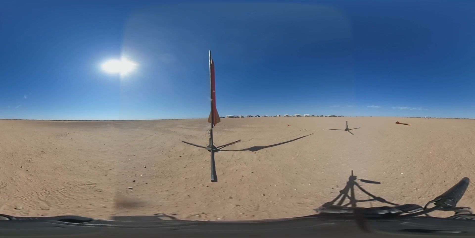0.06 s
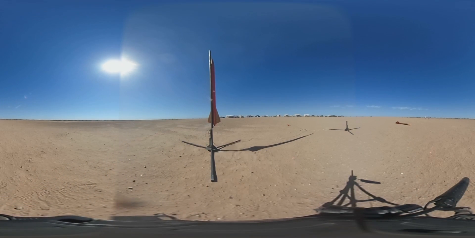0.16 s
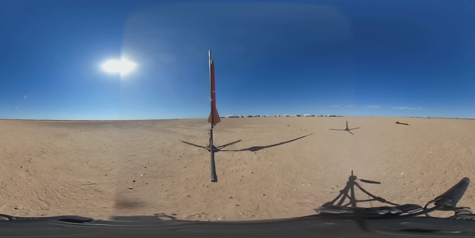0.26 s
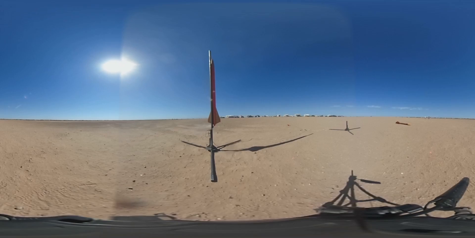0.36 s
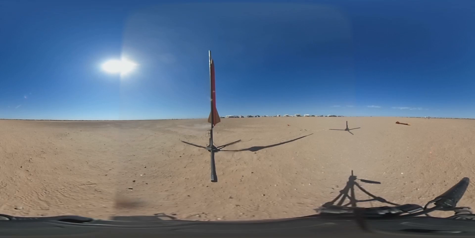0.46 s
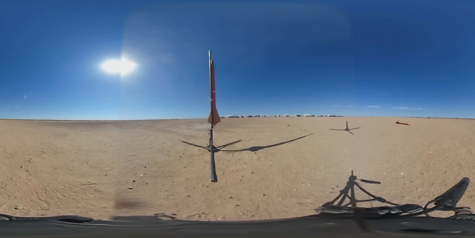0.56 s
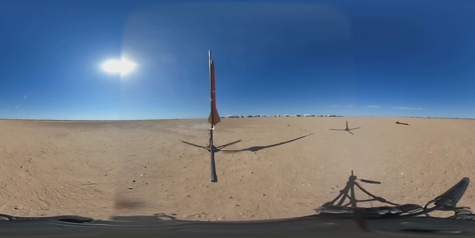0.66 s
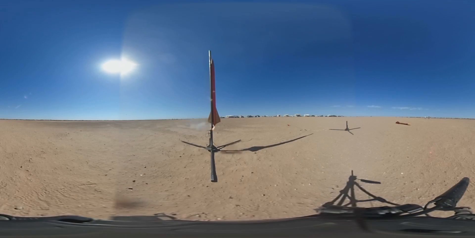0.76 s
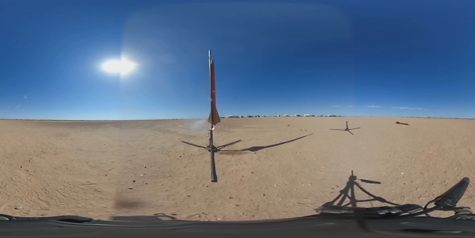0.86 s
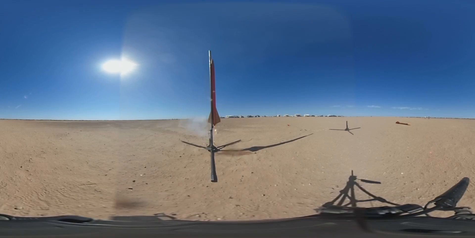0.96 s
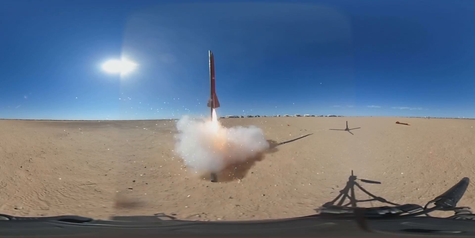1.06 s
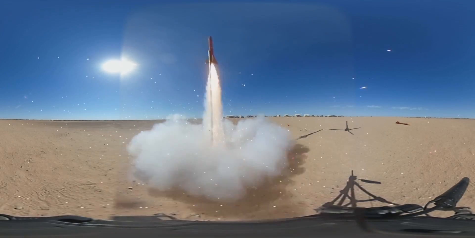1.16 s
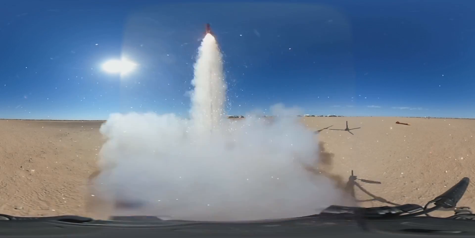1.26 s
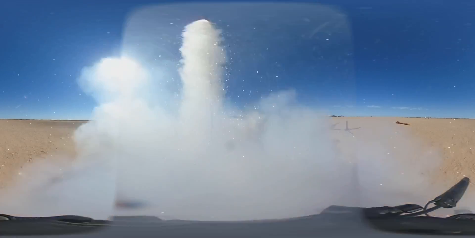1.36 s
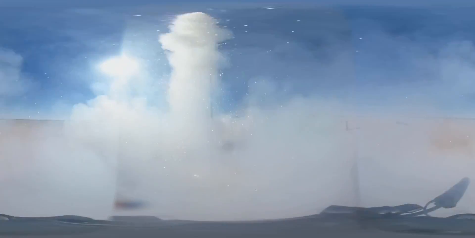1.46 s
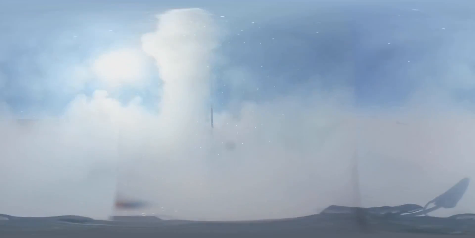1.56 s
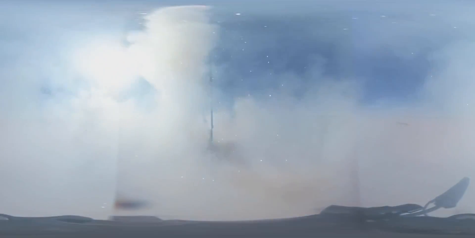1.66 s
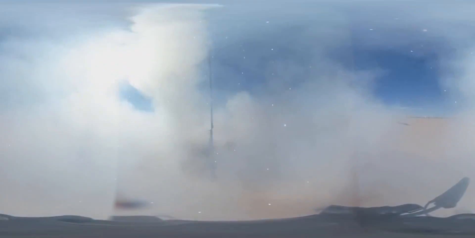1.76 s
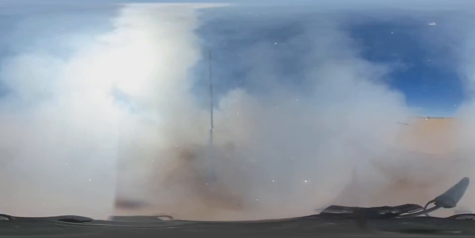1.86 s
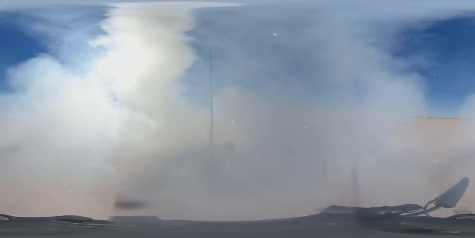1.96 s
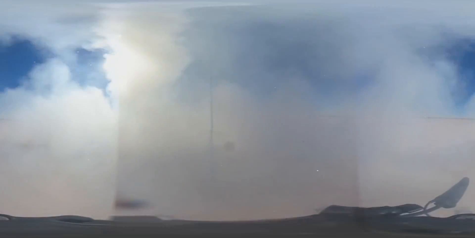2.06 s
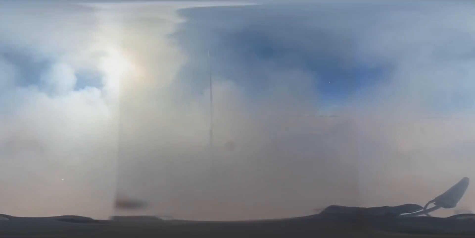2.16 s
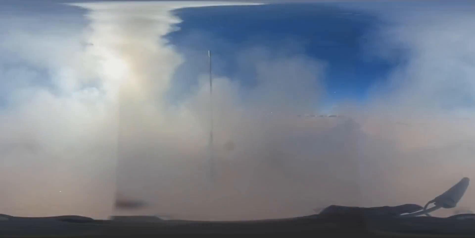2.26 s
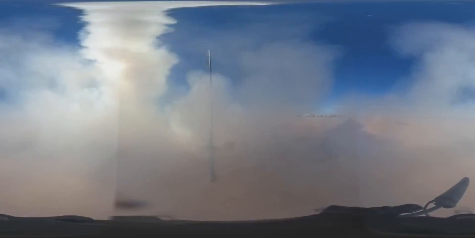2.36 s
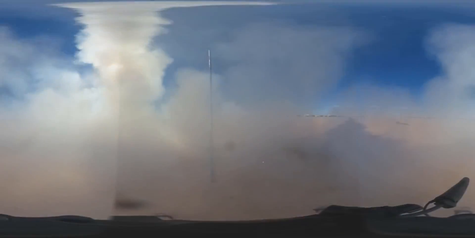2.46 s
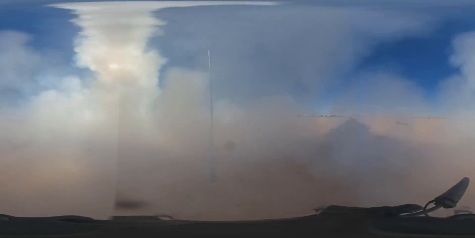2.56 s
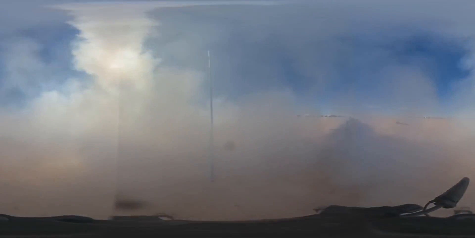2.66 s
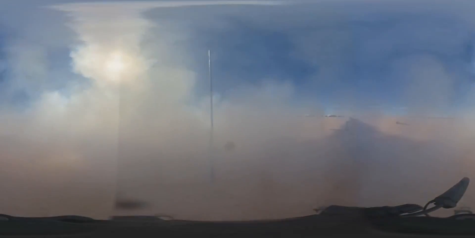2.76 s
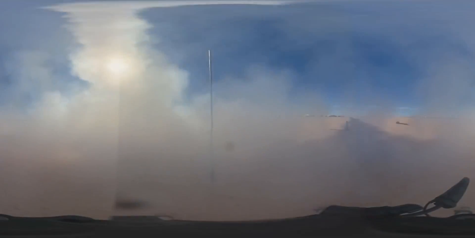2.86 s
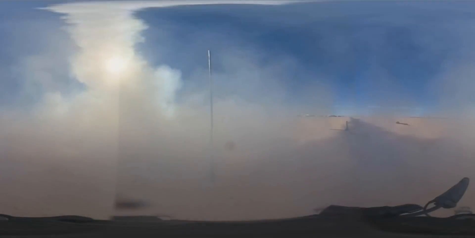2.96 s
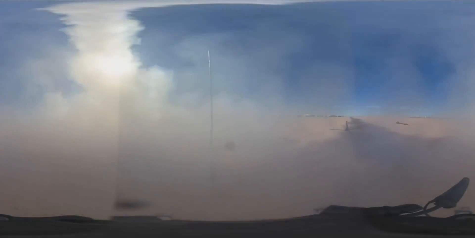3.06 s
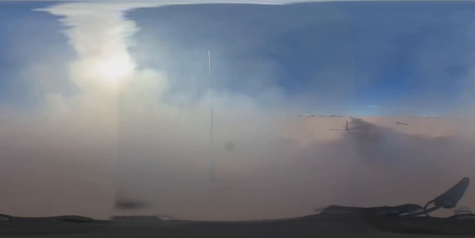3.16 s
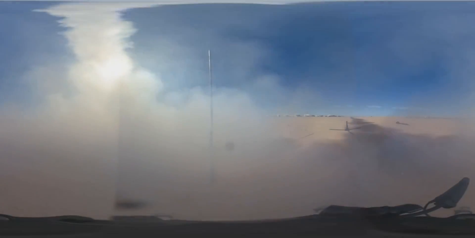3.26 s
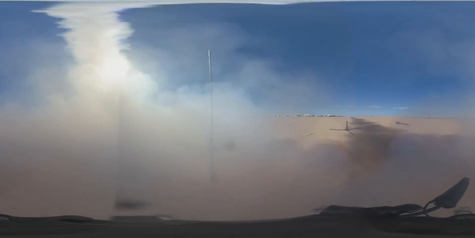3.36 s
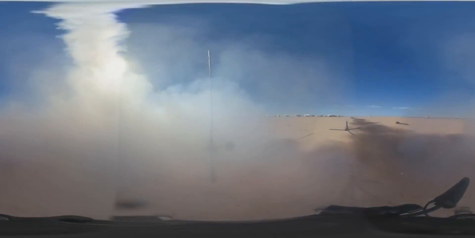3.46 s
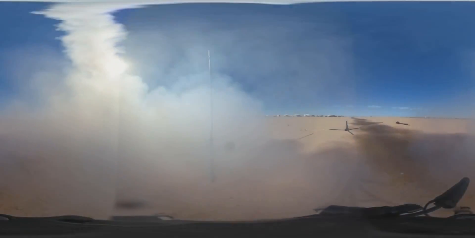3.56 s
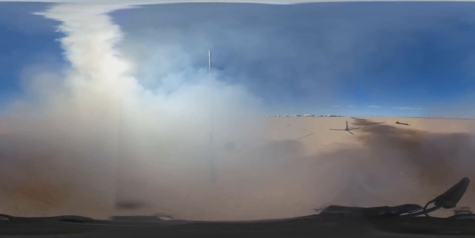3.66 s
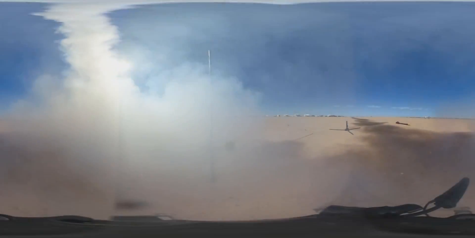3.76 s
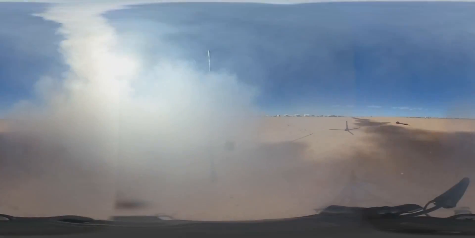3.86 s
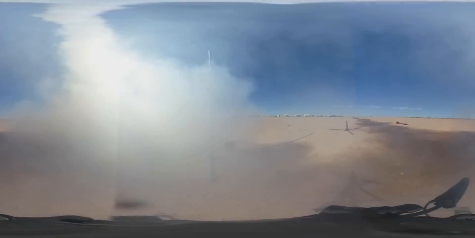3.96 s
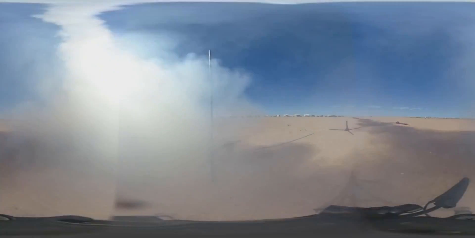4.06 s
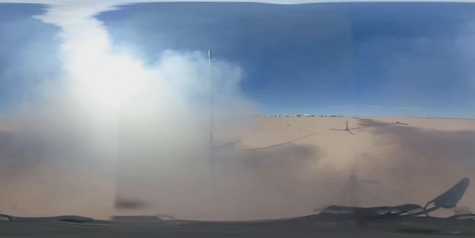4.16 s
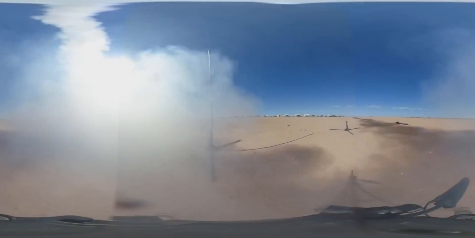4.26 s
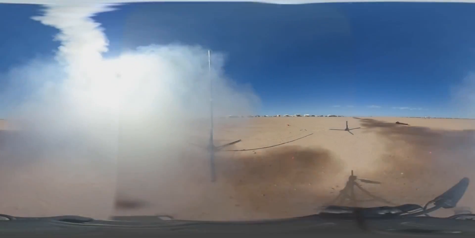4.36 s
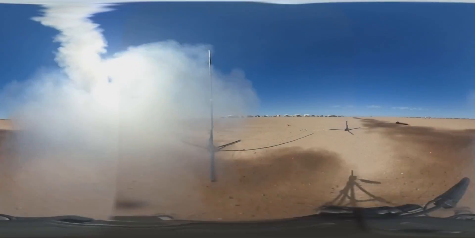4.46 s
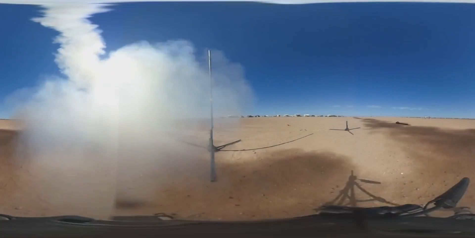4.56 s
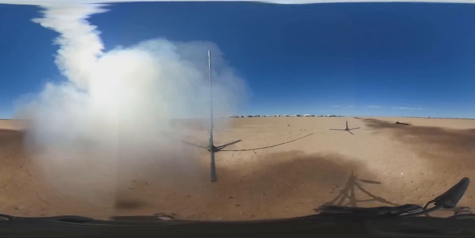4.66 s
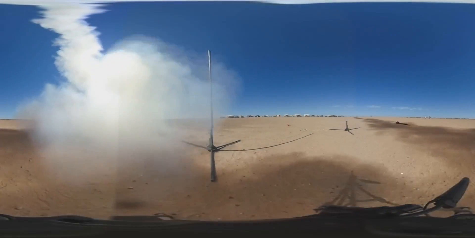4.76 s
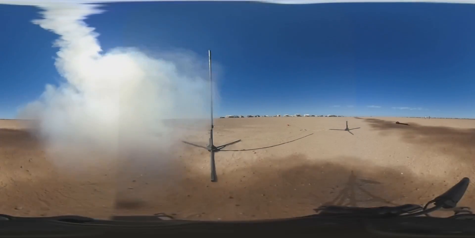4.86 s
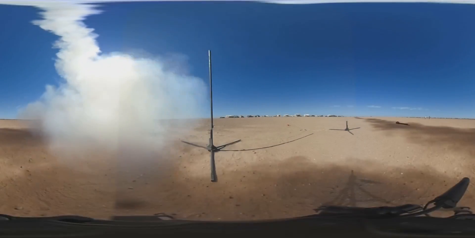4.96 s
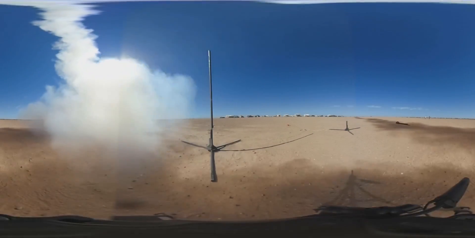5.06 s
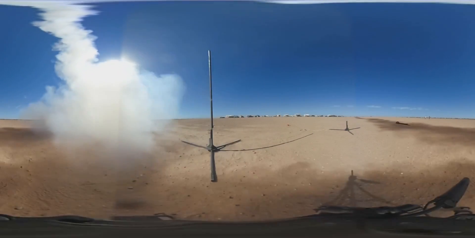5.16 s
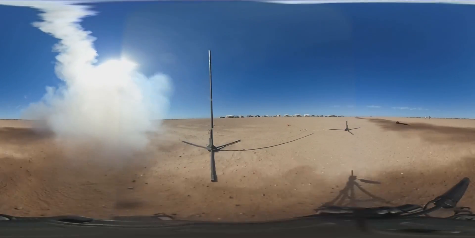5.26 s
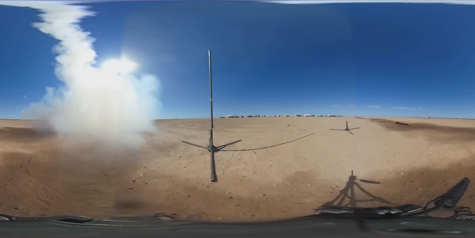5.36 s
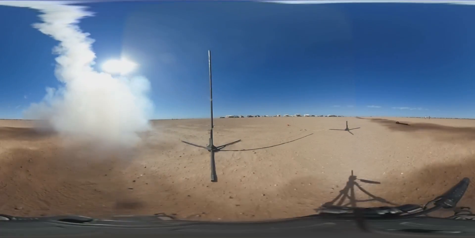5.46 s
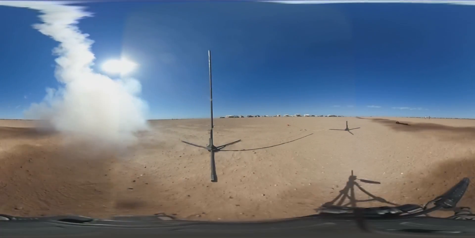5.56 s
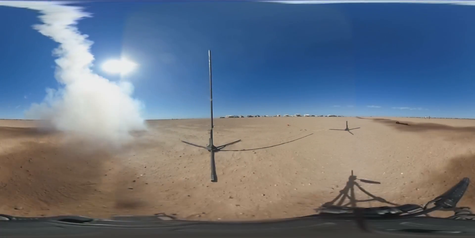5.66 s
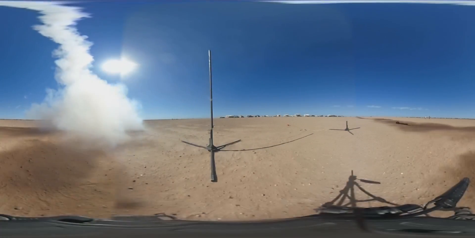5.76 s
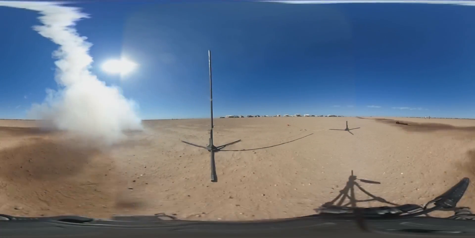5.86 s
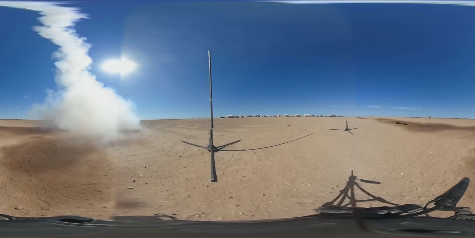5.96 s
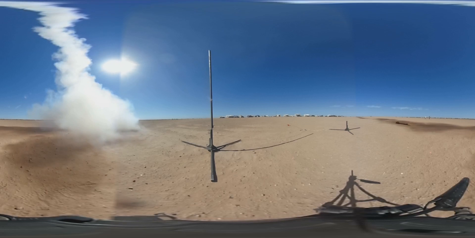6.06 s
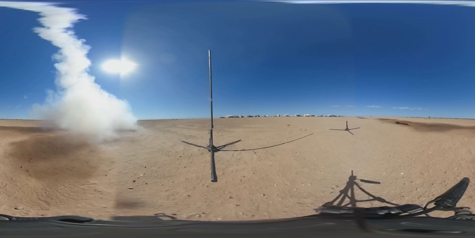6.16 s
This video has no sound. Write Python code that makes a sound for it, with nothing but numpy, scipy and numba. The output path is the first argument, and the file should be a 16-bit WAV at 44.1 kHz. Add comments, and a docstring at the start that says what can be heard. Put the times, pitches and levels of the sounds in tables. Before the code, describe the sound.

For the first 0.7 seconds there is only faint air hiss and a thin, high electrical whine, with a slight fizz growing. At 0.7 a soft pop lights the igniter; a flame swells, spitting sharper pops and a whistling hiss up to 1.03. Then the motor catches abruptly: a very loud, tearing blast a few metres away, overloading the small microphone into flat distortion, with heavy low gusts. From about 1.3 to 1.7 the sound deepens into a rumbling roar, its ground echo sweeping the tone. Between 1.8 and 2.3 it recedes with hard, irregular chuffs and crackle, while sand begins ticking on the housing. The weakening roar surges near 2.55 and stops around 3.1. A thin far echo rolls away, sparse grains tick, and low buffets thump until about 4.4. Quiet air, whine and a light breeze around 5 remain; the whine flicks upward and switches off just before 6.

```python
"""Open desert ground, where a hobby rocket lifts off a few metres from a small microphone in a housing.
The igniter pops and spits as coloured noise and pulses; the motor catches and overloads the microphone.
Its roar, hiss and chuffs climb away; each reaches the microphone directly and as a delayed ground echo.
Blown sand (noise and clicks) ticks on the housing, the exhaust cloud gusts past as low noise, and the
roar returns from afar; faint air, a thin whine and a late breeze lie beneath."""
import sys
import numpy as np
from scipy import signal
from scipy.fft import rfft, irfft
from scipy.io import wavfile
from scipy.ndimage import uniform_filter1d
from numba import njit

SR = 44100
rng = np.random.default_rng(int(sys.argv[2]) if len(sys.argv) > 2 else 0)


def generate_wav(sig):
    """Save sig (samples, or channels by samples) to the path in sys.argv[1] as 16-bit PCM at SR."""
    pcm = np.round(np.clip(np.atleast_2d(sig).T, -1, 1) * 32767).astype(np.int16)
    wavfile.write(sys.argv[1], SR, pcm)


N = 274478
TIME = np.arange(N) / SR
# the burn as heard: igniter fires, propellant catches, thrust ends
IGNITE_S, CATCH_S, BURNOUT_S = .697, 1.033, 3.073
CATCH_ATTACK_S, BURNOUT_FALL_DB_PER_S = .016, 67.5
FLAME_FALL_DB_PER_S = 500  # flame, whistle and leak are cut off at the catch


def undb(db):
    """Decibels to gain."""
    return 10 ** (np.asarray(db) / 20)


def unit(x):
    """Scale to rms 1."""
    return x / np.sqrt(np.mean(x ** 2))


def noise():
    """White noise over the whole scene."""
    return rng.standard_normal(N)


def curves(table):
    """One control per column, its points joined by straight lines."""
    seconds, *columns = np.transpose(table)
    return [np.interp(TIME, seconds, column) for column in columns]


def colour(x, points):
    """Causal minimum-phase filter whose spectrum runs through (frequency [Hz], level [dB]) points."""
    hz, db = np.transpose(points)
    grid_hz = np.fft.rfftfreq(2048, 1 / SR)
    level_db = np.interp(np.log(grid_hz + 1), np.log(hz), db)
    cepstrum = irfft(np.log(undb(level_db)))
    # folding the cepstrum forward in time makes the filter causal
    cepstrum[1:1024] *= 2
    cepstrum[1025:] = 0
    impulse = irfft(np.exp(rfft(cepstrum)))
    return signal.oaconvolve(x, impulse)[:N]


def ring(x, hz, width_hz):
    """One resonance, gain 1 at its centre."""
    return signal.lfilter(*signal.iirpeak(hz, hz / width_hz, fs=SR), x)


def walk(rate):
    """Smooth random wander of rms 1, with a new target level rate times a second."""
    hold = int(SR / rate)
    steps = np.repeat(rng.standard_normal(N // hold + 1), hold)
    return unit(uniform_filter1d(uniform_filter1d(steps, hold), hold)[:N])


def clicks(rate, spread_db):
    """Random impulses, rate a second on average, mostly small and a few large; rms 1."""
    size = undb(spread_db * np.minimum(rng.exponential(size=N), 4))
    struck = rng.random(N) < rate / SR
    return unit(struck * size * rng.choice([-1, 1], N))


def puffs(table):
    """Each sudden puff of gas sends out a push followed by a suction."""
    out = np.zeros(N)
    for s, db, ms in table:
        near = slice(int((s - .02) * SR), int((s + .02) * SR))
        u = (TIME[near] - s) * 1000 / ms  # time in half lengths: the extremes lie at -1 and 1
        out[near] -= undb(db) * u * np.exp((1 - u ** 2) / 2)
    return out


def envelope(s, db, attack_s, hold_s, fall_db_per_s):
    """Gain that is fully up at s, holds, then dies away."""
    attack = np.clip(1 + (TIME - s) / attack_s, 0, 1) ** 2
    return attack * undb(db - fall_db_per_s * np.maximum(TIME - s - hold_s, 0))


def swell(s, db, growth_db_per_s, fall_db_per_s):
    """Gain that grows exponentially to its peak at s, then dies away."""
    growth_db = growth_db_per_s * np.maximum(s - TIME, 0)
    fall_db = fall_db_per_s * np.maximum(TIME - s, 0)
    return undb(db - growth_db - fall_db)


# still desert air and microphone hiss: (frequency [Hz], relative level [dB])
AIR_COLOUR = [(20, 1), (45, 3.5), (80, 1.5), (140, -2), (260, -3), (380, -8.5), (600, -8), (900, -15),
              (1500, -21.5), (3000, -24.3), (12000, -26.8)]
# thin electrical whine: (frequency before its final flick [Hz], mean rms level [dB])
WHINE = [(1394, -83.5), (1857, -90)]
# light breeze after the launch: (frequency [Hz], relative level [dB])
BREEZE_COLOUR = [(20, -1), (42, 1.5), (90, -1), (140, -18), (400, -47)]
AIR_DB, WHINE_END_S = -72.6, 5.99
WHINE_RISE, WHINE_GLIDE_S, WHINE_STOP_S = .1, .018, .006  # rise as a share of pitch
BREEZE_S, BREEZE_DB, BREEZE_ATTACK_S, BREEZE_FALL_DB_PER_S = 5.0, -68, 1.8, 5


def background():
    """Faint noise of air, a late breeze, and sines of a whine that flicks up in pitch as it switches off."""
    air = unit(colour(noise(), AIR_COLOUR)) * undb(AIR_DB + 0.36 * walk(8))
    flick = np.clip(1 + (TIME - WHINE_END_S) / WHINE_GLIDE_S, 0, 1)
    clock = np.cumsum(1 + WHINE_RISE * flick) / SR  # runs faster during the flick
    whine = sum(np.sqrt(2) * undb(db) * np.sin(2 * np.pi * hz * clock) for hz, db in WHINE)
    switch_off = np.clip((WHINE_END_S - TIME) / WHINE_STOP_S, 0, 1)
    whine = whine * undb(.8 * walk(6)) * switch_off
    breeze = unit(colour(noise(), BREEZE_COLOUR)) * undb(1.5 * walk(11))
    breeze = breeze * envelope(BREEZE_S, BREEZE_DB, BREEZE_ATTACK_S, 0, BREEZE_FALL_DB_PER_S)
    return air + whine + breeze


# igniter smouldering before the flame takes: (frequency [Hz], relative level [dB])
SMOULDER_COLOUR = [(100, -11.5), (280, 3.5), (450, -12.5), (900, 0.5), (1100, -3.5), (1500, -5),
                   (2300, -7.5), (3200, -23), (6000, -29), (12000, -30)]
# igniter flame in the nozzle: (frequency [Hz], relative level [dB])
FLAME_COLOUR = [(40, -14.5), (130, -2), (280, 1), (450, -4.5), (820, 0), (1100, -11), (1500, -13),
                (2400, -20.5), (3200, -43), (6000, -41), (12000, -40.5)]
# soft hiss around the whistle: (frequency [Hz], relative level [dB])
FIZZ_COLOUR = [(3000, -25), (6300, -14), (7300, -1), (9300, 0.5), (10000, -4), (11300, 0.5), (14000, -6.5)]
# igniter firing and spitting: (time [s], peak level before the ground echo [dB], half length [ms])
POPS = [(.6985, -37.5, 1.7), (.7515, -34.5, 0.5), (.8695, -21.5, 0.36), (.9222, -19.5, 0.41),
        (.9345, -18.5, 0.34), (.9885, -17, 0.3), (1.0062, -12, 0.21)]
# the smoulder brightens just before the igniter fires
SMOULDER_DB, SMOULDER_SWELL_DB, SMOULDER_GROWTH_DB_PER_S = -74.5, -65.5, 82
# the flame grows steadily until the motor catches, then is blown out
FLAME_DB, FLAME_GROWTH_DB_PER_S, FLAME_ATTACK_S = -24.5, 76, .006
# smoke whistling out of the nozzle: once before the igniter fires, again just before the catch
FIZZ_HZ, FIZZ_WIDTH_HZ = 7900, 150
FIZZ_DB, FIZZ_GROWTH_DB_PER_S, FIZZ_FALL_DB_PER_S = -70.5, 25, 55
VENT_DB, VENT_GROWTH_DB_PER_S = -45, 150.5


def igniter():
    """Noise smoulders and fizzes; a pop, then a spitting flame swells until the propellant catches."""
    brightening = swell(IGNITE_S, SMOULDER_SWELL_DB, SMOULDER_GROWTH_DB_PER_S, FIZZ_FALL_DB_PER_S)
    glowing = undb(SMOULDER_DB) * (TIME < CATCH_S) + brightening
    smoulder = unit(colour(noise(), SMOULDER_COLOUR)) * glowing

    lit = np.clip(1 + (TIME - IGNITE_S) / FLAME_ATTACK_S, 0, 1)
    burning = lit * swell(CATCH_S, FLAME_DB, FLAME_GROWTH_DB_PER_S, FLAME_FALL_DB_PER_S)
    spit = unit(noise() + 0.66 * clicks(rate=500, spread_db=1.5))
    flame = unit(colour(spit, FLAME_COLOUR)) * burning * undb(0.53 * walk(59))

    fizzing = swell(IGNITE_S, FIZZ_DB, FIZZ_GROWTH_DB_PER_S, FIZZ_FALL_DB_PER_S)
    venting = swell(CATCH_S, VENT_DB, VENT_GROWTH_DB_PER_S, FLAME_FALL_DB_PER_S)
    whistle = unit(ring(noise(), FIZZ_HZ, FIZZ_WIDTH_HZ)) * undb(2.3 * walk(34))
    hiss = unit(colour(noise(), FIZZ_COLOUR))
    smoke = (.85 * whistle + 0.81 * hiss) * (fizzing + venting)
    return smoulder + puffs(POPS) + flame + smoke


# the nozzle's climb; the long flame splashing on the sand blurs the echo:
# (time [s], height [m], ground echo gain [share of the direct sound])
CLIMB = [(0, 1, 0.43), (.98, 1.047, 0.66), (1.04, 0.59, 0.45), (1.2, 2.22, 0.077), (1.35, 4.07, 0.3),
         (1.6, 18, 0.81), (2, 57, .65), (3, 160.4, 0.6), (6.2, 507, 0.64)]
PAD_M, MIC_HEIGHT_M = 3.157, .757
SOUND_SPEED = 343  # m/s


def over_ground(x):
    """The ground echo's lag follows the nozzle height, sweeping a comb of notches that settles with the climb."""
    height, share = curves(CLIMB)
    direct_m = np.hypot(PAD_M, height - MIC_HEIGHT_M)
    reflected_m = np.hypot(PAD_M, height + MIC_HEIGHT_M)
    lag_s = (reflected_m - direct_m) / SOUND_SPEED
    rough_sand = signal.butter(1, 2500, fs=SR, output="sos")  # dulls the echo
    scattered = signal.sosfilt(rough_sand, x)
    echo = np.interp(TIME - lag_s, TIME, scattered)
    return (x + share * echo) / np.hypot(1, share)


def flight():
    """Distance to the nozzle in m, and the cosine of the angle between the jet and the way to the microphone."""
    height, _ = curves(CLIMB)
    distance = np.hypot(PAD_M, height - MIC_HEIGHT_M)
    return distance, (height - MIC_HEIGHT_M) / distance


def thrust(db, spread_db, air_db_per_m):
    """Gain of a motor sound: steady source from catch to burnout, weaker with distance."""
    distance, _ = flight()
    burn = envelope(CATCH_S, db, CATCH_ATTACK_S, BURNOUT_S - CATCH_S, BURNOUT_FALL_DB_PER_S)
    return burn * undb(-spread_db * np.log10(distance / PAD_M) - air_db_per_m * distance)


# supersonic jet tearing the air: (frequency [Hz], relative level [dB])
HISS_COLOUR = [(200, -2.5), (1000, -5.5), (2300, 5.5), (3500, -3), (6000, -1), (7800, 2.5), (9500, -2),
               (11500, 5.5), (15000, -2)]
# source level, loss per tenfold distance, loss in the air; then the leak before the catch
HISS_DB, HISS_SPREAD_DB, HISS_AIR_DB_PER_M = -4, 33, 0.21
LEAK_DB, LEAK_GROWTH_DB_PER_S = -44, 80


def jet():
    """Fluttering noise from just behind the nozzle: a leak first, full at the catch, soon lost with distance."""
    leak = swell(CATCH_S, LEAK_DB, LEAK_GROWTH_DB_PER_S, FLAME_FALL_DB_PER_S) * (TIME > IGNITE_S)
    gain = leak + thrust(HISS_DB, HISS_SPREAD_DB, HISS_AIR_DB_PER_M)
    return unit(colour(noise(), HISS_COLOUR)) * gain * undb(0.5 * walk(150))


# eddies at the microphone port: (frequency [Hz], relative level [dB])
GUST_COLOUR = [(15, -8), (40, -2.5), (85, 0.5), (130, -1), (200, -8.5), (300, -18.5), (500, -29.5),
               (1000, -49.5), (3000, -76.5)]
# gusts from the ignition, the blast and the drifting cloud: (time [s], level before flutter [dB], hold [s])
GUSTS = [(0.708, -51, 0.11), (0.93, -40.5, .01), (1.06, -24, .05), (1.31, -21, 0.055), (1.59, -25.5, .03),
         (1.736, -33, 0.13), (2.57, -45.5, 0.011), (2.746, -53.5, 0.17), (2.949, -44, .06),
         (3.21, -54, 0.14), (3.45, -49, .06), (3.603, -54, .04), (3.74, -49, 0.076), (3.866, -48.5, 0.11),
         (4.045, -48, 0.097), (4.34, -57.5, .06), (4.671, -67, .01)]
# single buffets of air on the port: (time [s], peak level [dB], half length [ms])
BUFFETS = [(2.975, -35, 2.4), (3.313, -38.5, 1.43), (3.443, -39.5, 1.14), (3.51, -54.5, 1.9),
           (3.853, -39, 1.24), (3.88, -41.5, 1.01), (4.036, -43, 1.37), (4.0995, -35.5, 2.5),
           (4.1095, -42.5, .9), (4.171, -47, 1.3), (4.425, -46.5, 1.63)]
GUST_ATTACK_S, GUST_FALL_DB_PER_S = 0.052, 95


def wind():
    """The blast and the drifting cloud shove air over the microphone port, gust by gust, as low noise."""
    power = sum(envelope(s, db, GUST_ATTACK_S, hold_s, GUST_FALL_DB_PER_S) ** 2 for s, db, hold_s in GUSTS)
    eddies = unit(colour(noise(), GUST_COLOUR)) * undb(2.2 * walk(35))
    return eddies * np.sqrt(power) + puffs(BUFFETS)


# surges of the uneven burn: (time [s], extra level at the peak [dB])
SURGES = [(1.824, 5), (1.897, 5.5), (2.56, 5), (2.98, 0.5)]
SURGE_HALF_S = 0.027  # half width where the extra dB have dropped to 1 / e
# source level, loss per tenfold distance, loss in the air
ROAR_DB, ROAR_SPREAD_DB, ROAR_AIR_DB_PER_M = 8, 24, 0.04
# the roar is beamed aft: cosine of the cone's half angle, loss per unit of cosine outside it
CONE_COSINE, OFF_CONE_DB = .72, 80
# the flame splashing on the sand, then the faint rush of the coasting rocket
SPLASH_DB, SPLASH_HOLD_S, SPLASH_FALL_DB_PER_S = -9.5, .05, 200
COAST_DB, COAST_HOLD_S, COAST_FALL_DB_PER_S = -78.5, 2.3, 15


def roar_gain():
    """Splash on the sand; the roar swells as its cone takes in the microphone, surges, recedes to a rush."""
    _, aft = flight()
    surge_db = sum(db * np.exp(-((TIME - s) / SURGE_HALF_S) ** 2) for s, db in SURGES)
    cone_db = -OFF_CONE_DB * np.maximum(CONE_COSINE - aft, 0)
    beamed = thrust(ROAR_DB, ROAR_SPREAD_DB, ROAR_AIR_DB_PER_M) * undb(cone_db + surge_db)
    splash = envelope(CATCH_S, SPLASH_DB, CATCH_ATTACK_S, SPLASH_HOLD_S, SPLASH_FALL_DB_PER_S)
    coast = envelope(BURNOUT_S, COAST_DB, CATCH_ATTACK_S, COAST_HOLD_S, COAST_FALL_DB_PER_S)
    return splash + beamed + coast


@njit
def high_pass(x, hz):
    """State-variable high-pass with a moving corner."""
    out, band, low, damping = np.empty(len(x)), 0., 0., 1.2
    for i in range(len(x)):
        g = np.tan(np.pi * hz[i] / SR)
        v = (band + g * (x[i] - low)) / (1 + g * (g + damping))
        out[i] = x[i] - damping * v - (low + g * v)
        band, low = 2 * v - band, low + 2 * g * v
    return out


# turbulent plume: (frequency [Hz], relative level [dB])
ROAR_COLOUR = [(30, -11), (100, -2.5), (230, -2.5), (330, -4), (460, -4), (700, -8), (1100, -13),
               (1800, -18.5), (2600, -22.5), (3300, -35), (4500, -44), (7000, -53), (12000, -56)]
# lower edge of the roar; the big slow eddies far down the plume are heard late:
# (time [s], high-pass corner [Hz])
ROAR_EDGE = [(1.1, 300), (1.15, 920), (1.21, 860), (1.28, 392), (1.48, 192), (1.7, 140), (2.55, 150),
             (2.95, 210), (3.4, 380)]
# chuffs of the motor: (time [s], peak level before rasp and ground echo [dB], half length [ms])
CHUFFS = [(1.69, -19, 2.9), (1.822, -9, 0.64), (1.912, -8.5, 1.45), (1.927, -15, 1.2), (1.947, -8.5, 0.62),
          (1.983, -10.5, 0.76), (2.0435, -8.5, 0.65), (2.057, -4, 0.77), (2.0955, -5, 0.75),
          (2.16, -17, 0.7), (2.176, -14.5, 0.69), (2.244, -2, 1.07), (2.2757, -7, 0.59), (2.329, -21, 0.92),
          (2.452, -20.5, 0.76), (2.5725, -17, 1.2)]
ROAR_FLUTTER_DB, CHUFF_RASP = 1.4, 0.029
# the largest eddies
RUMBLE_HZ, RUMBLE_WIDTH_HZ = 232, 230
RUMBLE_S, RUMBLE_DB, RUMBLE_ATTACK_S, RUMBLE_HOLD_S, RUMBLE_FALL_DB_PER_S = 1.38, -11, 0.32, .31, 61.5


def plume():
    """Noise eddies roar and rumble, clicks of small shocks crackle, and pulses of gas chuff."""
    low_hz, = curves(ROAR_EDGE)
    turbulence = noise() + 0.65 * clicks(rate=700, spread_db=2.5)
    roar = high_pass(unit(colour(turbulence, ROAR_COLOUR)), low_hz)
    # even out the level so that the moving edge changes only the tone
    steady_roar = roar / np.sqrt(uniform_filter1d(roar ** 2, size=8192))
    roar = steady_roar * roar_gain() * undb(ROAR_FLUTTER_DB * walk(45))

    rumble = ring(ring(noise(), RUMBLE_HZ, RUMBLE_WIDTH_HZ), RUMBLE_HZ, RUMBLE_WIDTH_HZ)
    rumble_gain = envelope(RUMBLE_S, RUMBLE_DB, RUMBLE_ATTACK_S, RUMBLE_HOLD_S, RUMBLE_FALL_DB_PER_S)
    rumble = unit(rumble) * rumble_gain

    # each chuff carries a burst of fine turbulence
    rasp = unit(ring(ring(noise(), 2500, 4000), 2500, 4000))
    return roar + rumble + puffs(CHUFFS) * (1 + CHUFF_RASP * rasp)


# sand on the housing: (frequency [Hz], relative level [dB])
SAND_COLOUR = [(1000, -16.5), (2400, -12), (4000, -6.5), (5500, -2), (6800, -11), (8200, 0.5), (9500, -4.5),
               (11600, 9.5), (14000, -9)]
# thicker flurries of sand: (time [s], level before flutter [dB])
FLURRIES = [(2.05, -53.5), (2.5, -67), (3.04, -72), (3.88, -75)]
# grains striking the housing: (time [s], strike level [dB], level of their ring relative to the strike [dB])
GRAINS = [(2.3053, -54, -13), (2.4679, -52.5, -20), (2.6126, -63, -16), (2.629, -49.5, -22),
          (2.907, -61.5, 4), (3.0307, -55, -17), (3.4553, -71.5, -22), (3.746, -73, -22)]
GRAIN_RING_HZ = 8200
# blown sand arrives, thins out and stops when the cloud has passed
SAND_S, SAND_DB, SAND_ATTACK_S, SAND_THINNING_DB_PER_S, SAND_END_S = 2.0, -67, .25, 9.5, 4.36
FLURRY_ATTACK_S, FLURRY_FALL_DB_PER_S = .04, 145


def sand():
    """Dust is noise, fine grains shower as clicks, coarse ones tick as noise bursts with the housing's ring."""
    stop = np.clip((SAND_END_S - TIME) / SAND_ATTACK_S, 0, 1)
    drift = envelope(SAND_S, SAND_DB, SAND_ATTACK_S, 0, SAND_THINNING_DB_PER_S) * stop
    flurries = sum(envelope(s, db, FLURRY_ATTACK_S, 0, FLURRY_FALL_DB_PER_S) for s, db in FLURRIES)
    grit = clicks(rate=1100, spread_db=5.0) + .8 * noise()
    shower = unit(colour(grit, SAND_COLOUR)) * (drift + flurries) * undb(1.3 * walk(12))

    scratch = noise()
    tick = unit(colour(scratch, SAND_COLOUR))
    housing = unit(ring(scratch, GRAIN_RING_HZ, 1200))
    for s, db, ring_db in GRAINS:
        strike = undb(db) * (TIME >= s) * np.exp(-np.abs(TIME - s) / .0025)
        shower = shower + strike * (0.85 * tick + undb(ring_db) * housing)
    return shower


# the roar scattered back from afar: (frequency [Hz], relative level [dB])
RETURN_COLOUR = [(100, -11), (350, -1.5), (570, 1.5), (900, -1), (1250, -6), (1600, -9), (2500, -9.5),
                 (3300, -18), (5000, -31.5), (10000, -48)]
# its waves from across the desert: (time [s], level before flutter [dB], attack [s], fall [dB/s])
RETURNS = [(3.06, -56, 0.46, 27.5), (3.5, -76, .5, 6), (4.7, -79, .08, 50), (5.72, -80, .2, 36)]


def far_echo():
    """Scrub and rises in the plain send the roar back late, as thin noise that rolls in level."""
    power = sum(envelope(s, db, attack_s, 0, fall) ** 2 for s, db, attack_s, fall in RETURNS)
    return unit(colour(noise(), RETURN_COLOUR)) * np.sqrt(power) * undb(1.3 * walk(21))


def scene():
    """Igniter, plume and jet come over the ground; sand and wind act at the microphone itself."""
    rocket = over_ground(igniter() + plume() + jet()) + far_echo()
    return (rocket + sand() + wind() + background())[None]


OVERLOAD = 0.19  # largest amplitude the microphone passes
BAND_EDGE_HZ, TOP_HZ = 12050, 14700


def record(dry):
    """The microphone saturates into flat-topped waves; the top treble is cut down in two steps."""
    fine = signal.resample_poly(dry, 2, 1, axis=-1)  # room for the overtones of clipping
    flattened = fine / (1 + (fine / OVERLOAD) ** 8) ** (1 / 8)
    clipped = signal.resample_poly(flattened, 1, 2, axis=-1)
    hz = np.fft.rfftfreq(N, 1 / SR)
    shelf_db = -14 * np.clip((hz - BAND_EDGE_HZ) / 150, 0, 1)
    narrowed = irfft(rfft(clipped) * undb(shelf_db), N)
    return signal.sosfilt(signal.ellip(8, .2, 70, TOP_HZ, fs=SR, output="sos"), narrowed)


dry = scene()
out = record(dry)
generate_wav(out)
```